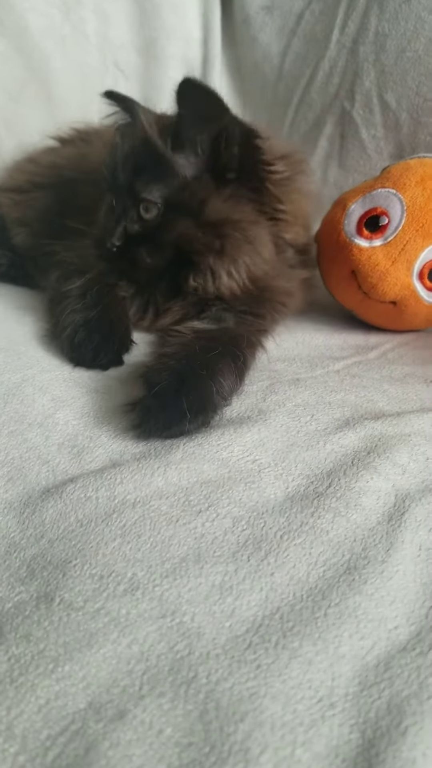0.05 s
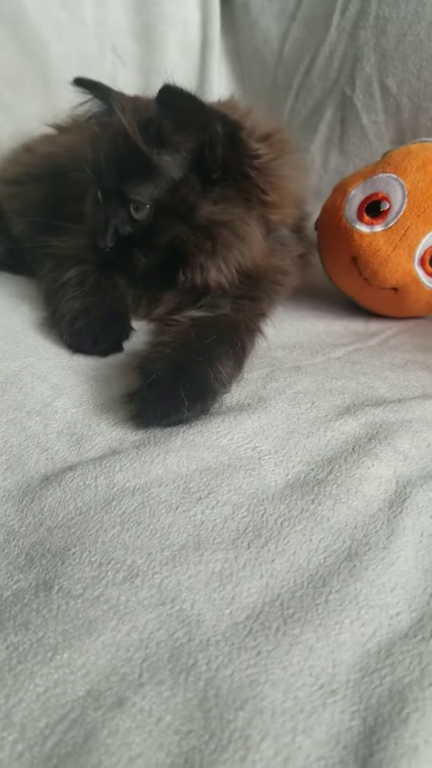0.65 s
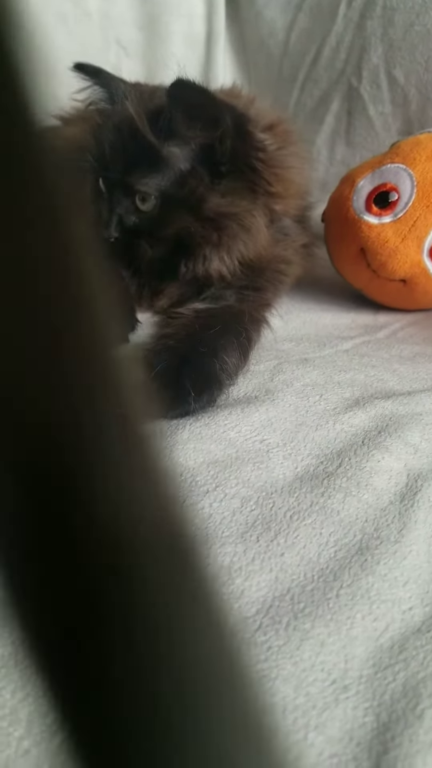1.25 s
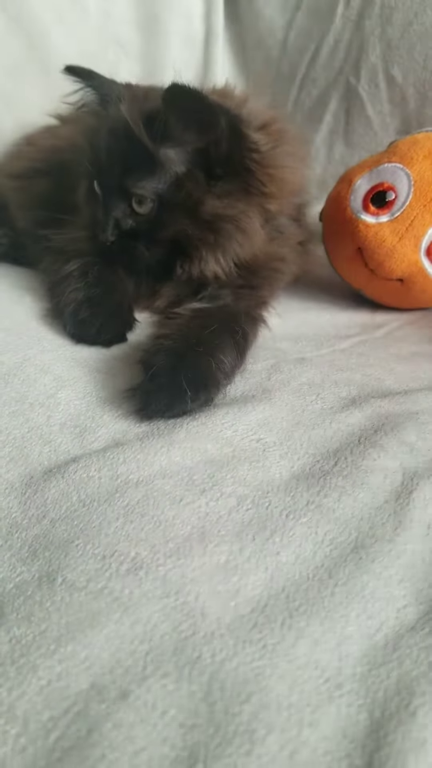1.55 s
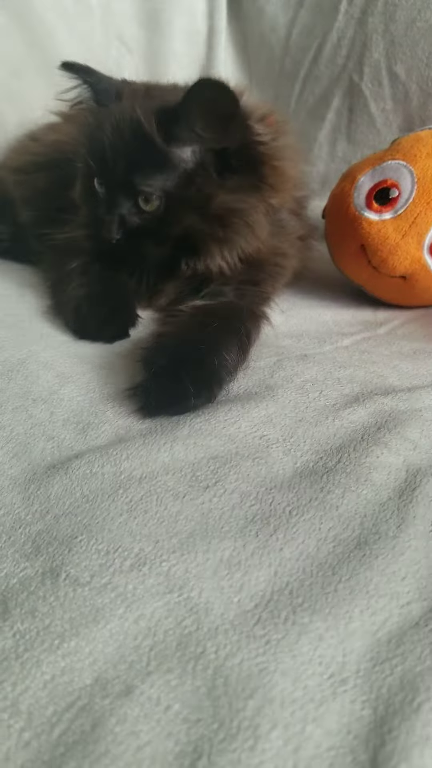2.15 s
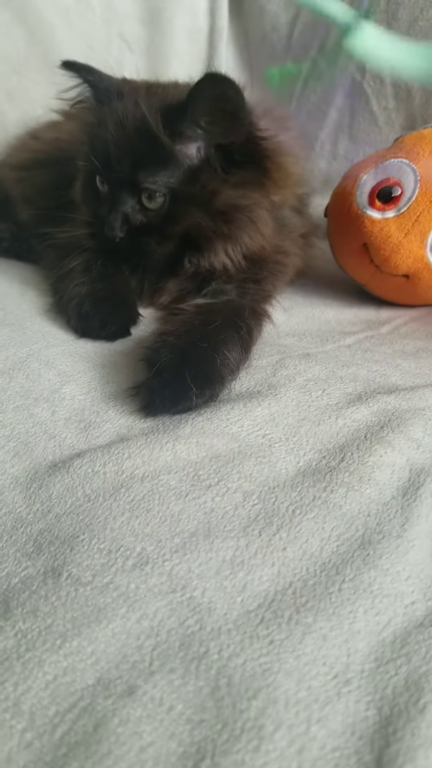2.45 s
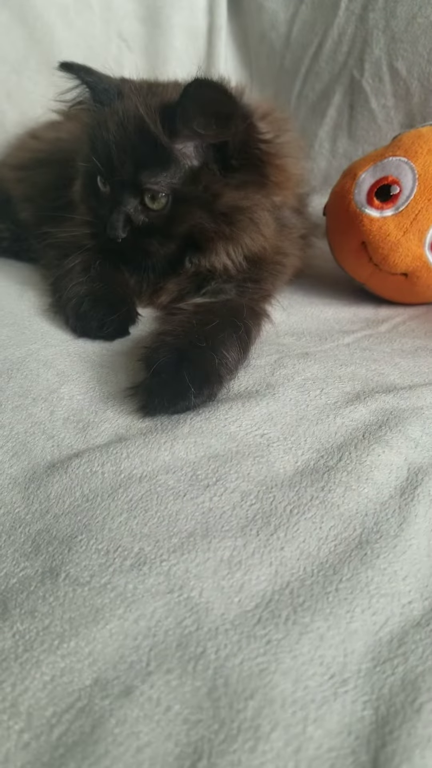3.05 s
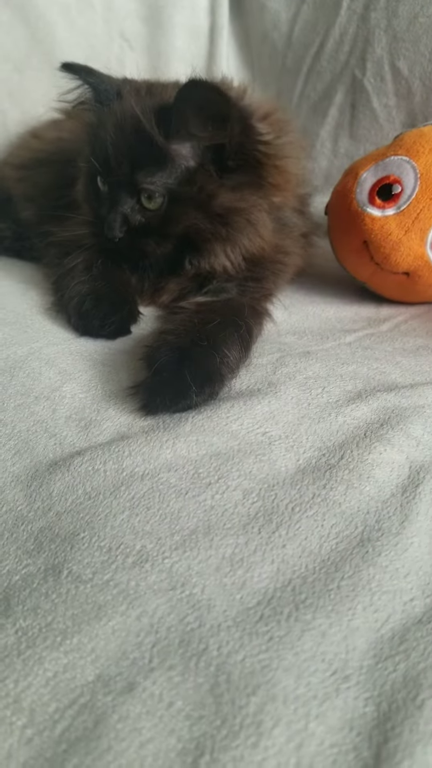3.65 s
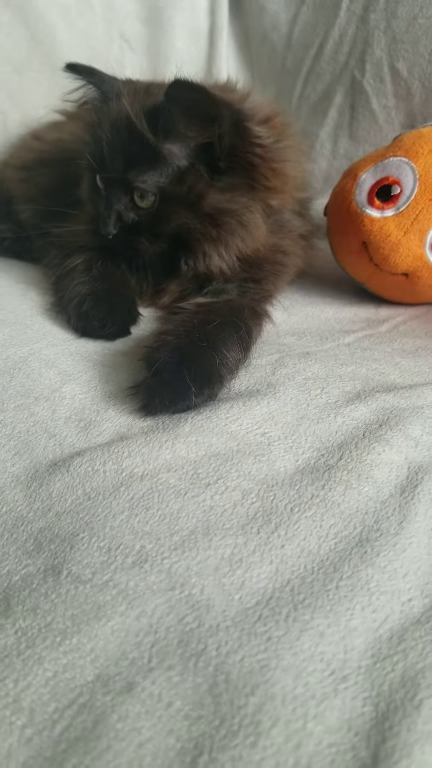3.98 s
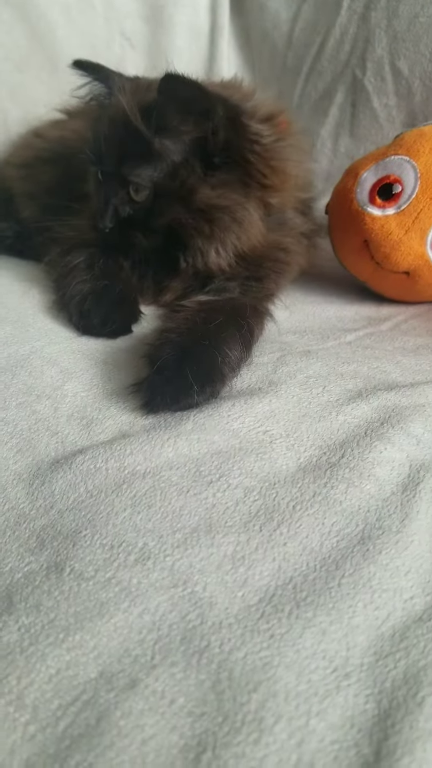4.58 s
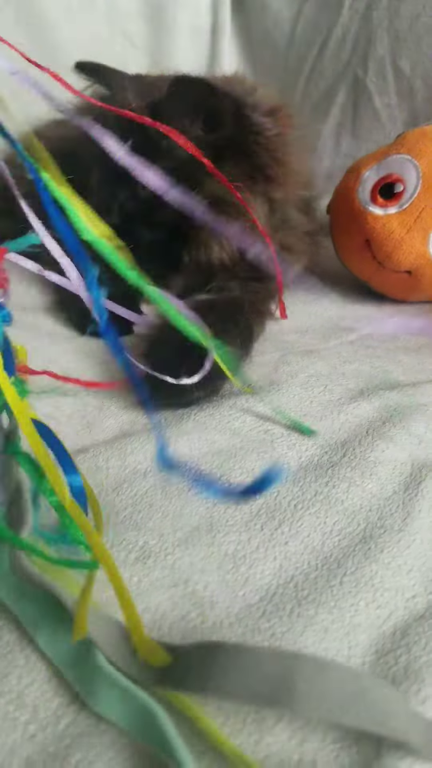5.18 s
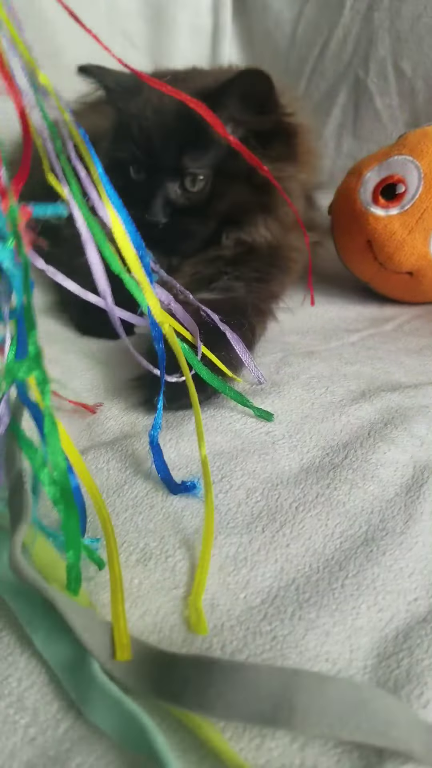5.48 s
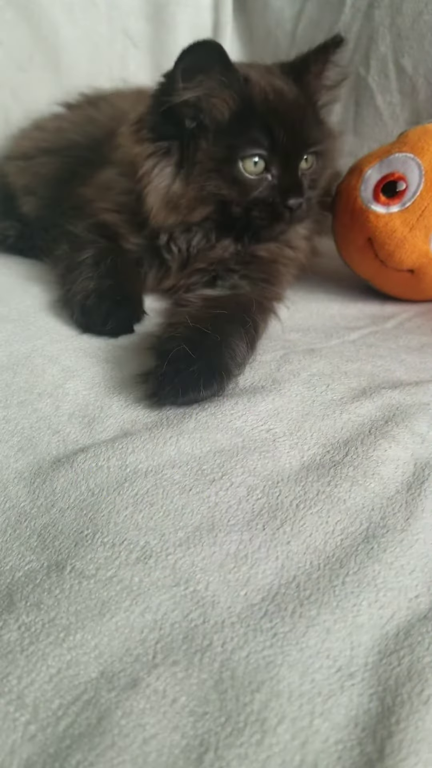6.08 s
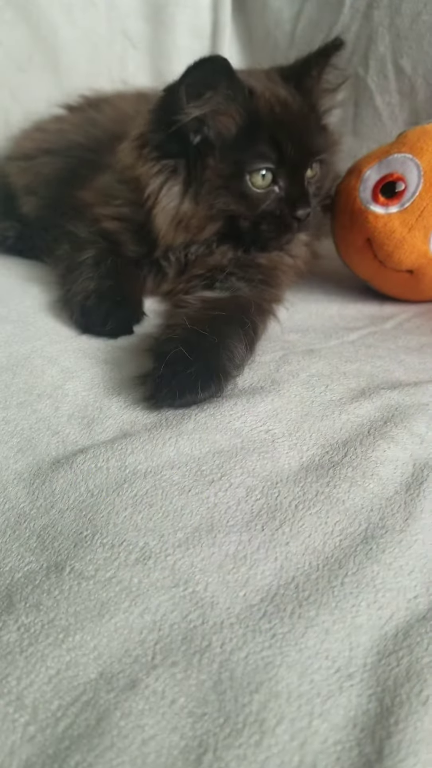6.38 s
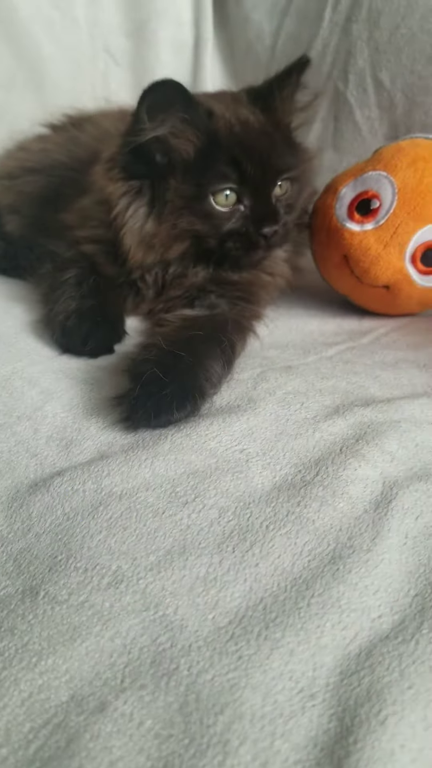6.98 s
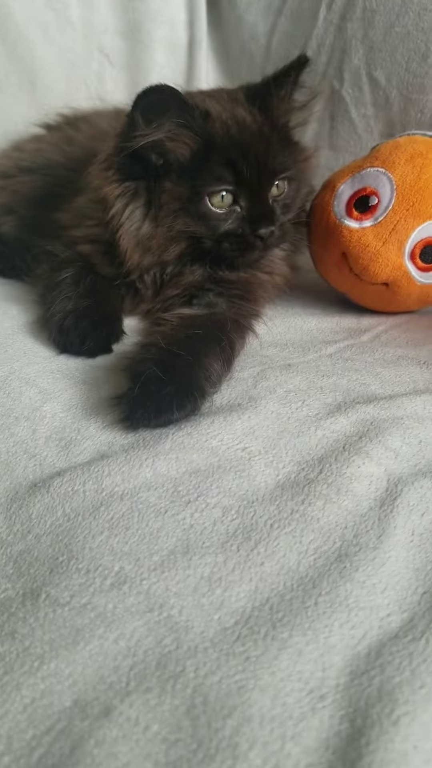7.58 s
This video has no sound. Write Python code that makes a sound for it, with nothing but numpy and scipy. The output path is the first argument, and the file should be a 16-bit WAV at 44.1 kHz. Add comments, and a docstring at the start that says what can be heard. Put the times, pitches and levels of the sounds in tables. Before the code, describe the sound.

Light, high jingling from a shaken ribbon wand toy comes and goes indoors, broken by several close taps on the microphone.

```python
"""Pellet bell on a ribbon wand

The wand is shaken in short bursts for a kitten, just right of a phone in a quiet room.
Each jerk throws the pellet against the shell; gentle sways make it tumble. The ribbons swish.
Now and then the wand taps the phone, mostly beside its left microphone."""
import sys
import numpy as np
from scipy import signal
from scipy.fft import rfft, irfft, next_fast_len
from scipy.io import wavfile
from scipy.ndimage import uniform_filter1d

SR = 44100
rng = np.random.default_rng(int(sys.argv[2]) if len(sys.argv) > 2 else 0)


def inscribe(sig):
    """Save sig as 16-bit PCM at rate SR to the path in sys.argv[1].

    A 1-D sig is mono; a 2-D sig holds one channel per row.
    Samples are clipped to [-1, 1] before scaling.
    """
    pcm = np.round(np.clip(np.atleast_2d(sig).T, -1, 1) * 32767)
    wavfile.write(sys.argv[1], SR, pcm.astype(np.int16))


N = 345303

# noise floor per microphone: freq_hz, density_db
FLOOR_LEFT = [(130, -91.5), (230, -106), (700, -113), (1100, -113), (1380, -99), (1950, -95), (2500, -110),
              (3400, -117), (9000, -119), (14500, -116)]
FLOOR_RIGHT = [(130, -82.5), (250, -91.5), (380, -103), (520, -102), (700, -111), (1400, -114),
               (9000, -119.5), (14500, -117.5)]
# faint treble hiss fading at the start, ribbon sweeps, hand shifts, room echo after the 3.99 s tap:
# peak_s, sigma_s, level_db, centre_hz, sigma_octaves
NOISE_SWELLS = [(0.03, 0.39, -68.5, 4900, 2.7), (0.379, 0.02, -55.5, 296, 1.6),
                (1.83, 0.031, -56, 1540, 1.4), (2.151, 0.045, -63, 1700, 1.2),
                (2.91, 0.04, -59.5, 1930, 1.54), (3.246, 0.031, -61.5, 1476, 0.9),
                (4.036, 0.036, -53, 1170, 1.25), (5.906, 0.031, -52, 127, 1.2),
                (6.963, 0.036, -51, 90.2, 0.47)]
# wand sways: start_s, end_s, mid_sway_contact_db
SWAYS = [(0.056, 0.262, -76), (0.454, 0.719, -73), (0.889, 1.158, -65.5), (1.207, 1.254, -59.5),
         (2.686, 2.95, -66), (3.515, 3.631, -65), (4.9, 5.058, -65.5), (5.096, 5.319, -72.5),
         (6.513, 6.673, -60), (6.894, 7.305, -76.5)]
# pellet throws: time_s, level_db, tick_rel_db (high if square, low if glancing), bounce_rel_db
STRIKES = [(0.134, -62, -8.5, -3.5), (0.427, -63, -10.5, -11.5), (0.634, -66.5, -14, -5),
           (1.012, -64, -3, 1), (1.059, -60, -11, 1.5), (1.121, -62.5, -5.5, -1.5), (1.251, -48, -19, -8),
           (1.334, -54, -8, -11), (1.612, -62.5, -7.5, 1.5), (1.645, -60.5, -12, -13.5),
           (1.741, -56.5, -8, -2.5), (1.7839, -36, -8, -22), (1.841, -47, -17, -14.5),
           (1.9584, -42, -26.5, -19.5), (1.996, -55, -12, -10), (2.045, -53.5, -1.5, -15.5),
           (2.0618, -46, -26, -7.5), (2.118, -48.5, -2.5, -3.5), (2.413, -73.5, -10, -27),
           (2.753, -51, -14, 1), (2.801, -47, -6, -2.5), (2.808, -42, -19.5, -20.5), (2.945, -54.5, -3, -9),
           (3.051, -57, -4.5, -1.5), (3.197, -58.5, -19.5, 3.5), (3.244, -57, -4, -15),
           (3.457, -56, -17, -3.5), (3.513, -54.5, -5, 0), (3.751, -68.5, -2.5, 1.5),
           (3.887, -76, -1, -18.5), (4.163, -70, 4.5, -14), (4.2778, -47, -29, -7.5), (4.38, -54, -7.5, -6),
           (4.4121, -47.5, 0.5, -10.5), (4.441, -47, -9, -9), (4.488, -53, -26, -3), (4.613, -49, -10, -1),
           (4.636, -52.5, 3, -10.5), (4.717, -61, -9.5, -8), (4.879, -54, -25, -3), (4.989, -59.5, -8.5, 1),
           (6.55, -55, -28, -5.5), (6.5755, -42, -7, -9), (6.616, -44.5, -18, -1), (6.697, -44, -12.5, -1),
           (6.745, -52, -12, -1.5), (6.912, -64.5, -5.5, -4.5), (7.058, -70, -8.5, -3),
           (7.298, -63, -3, 0.5), (7.329, -64.5, -4.5, -14)]
# shell modes: freq_hz, gain_db, t60_s
LOW_MODES = [(5082, 0, .07), (5140, -2, .03), (5430, -6, .025), (6170, -13, .04)]
HIGH_MODES = [(11750, -5, .05), (11830, -9, .025), (12915, 0, .05), (12970, -2, .028)]
# pellet contact spectrum: freq_hz, gain_db
TICK_SPECTRUM = [(3000, -3), (4400, -5.5), (5400, 5.5), (6900, -7), (8800, 1.5), (10700, -7), (12400, 2),
                 (13500, -3), (14600, -2.5)]
# room decay: freq_hz, t60_s
ROOM_DECAY = [(2000, .29), (14000, .23)]
# wand on phone: time_s, peak_db, highpass_hz, lowpass_hz, left_minus_right_db, room_rel_db
TAPS = [(1.2533, 0, 80.8, 3600, 17, -33), (2.347, -44.5, 50, 497, 29, -23.5),
        (3.035, -39.5, 1300, 1060, -10.5, -5), (3.992, -20, 480, 3800, 34, -25),
        (4.7465, -11.5, 63.5, 872, 23, -24.5), (4.989, -34, 70, 1213, 42, -7.5),
        (5.870, -24, 800, 15200, -22.5, -8.5), (5.881, -26.5, 798, 15000, -27, -7)]
# phone casing response: freq_hz, gain_db
CASING = [(110, 0), (280, -2.5), (480, 1.5), (750, -3.5), (1050, 2), (1680, -6), (1900, 6), (2400, 4),
          (3400, 3.5), (4400, -5), (14000, -6)]


def amp(db):
    """Decibels to gain."""
    return 10 ** (np.asarray(db) / 20)


def unit_rms(x):
    """x at rms 1."""
    return x / np.sqrt(np.mean(x ** 2) + 1e-20)


def log_interp(points, hz):
    """(freq_hz, value) points read on a log axis."""
    freqs_hz, values = np.transpose(points)
    return np.interp(np.log(hz + 1), np.log(freqs_hz + 1), values)


def decay(t, t60_s):
    """Exponential, -60 dB at t60_s."""
    return np.exp(-np.log(1000) * t / t60_s)


def filtered(x, response):
    """x through the gain response(hz)."""
    size = next_fast_len(N + SR // 2)
    return irfft(rfft(x, size) * response(np.fft.rfftfreq(size, 1 / SR)), size)[..., :N]


def impulse(response, size=2048):
    """Minimum-phase pulse with gain response(hz)."""
    cepstrum = irfft(np.log(np.maximum(response(np.fft.rfftfreq(size, 1 / SR)), 1e-6)))
    cepstrum[1:size // 2] *= 2
    cepstrum[size // 2 + 1:] = 0
    return irfft(np.exp(rfft(cepstrum)))


def add(track, start_s, sound):
    """Mix sound into track."""
    part = track[..., max(round(start_s * SR), 0):][..., :sound.shape[-1]]
    part += sound[..., :part.shape[-1]]


def background():
    """Room rumble and microphone hiss, with a band near 1.7 kHz on the left."""
    white = rng.standard_normal((2, N)) * np.sqrt(SR / 2)  # unit power per Hz
    return filtered(white, lambda hz: amp([log_interp(FLOOR_LEFT, hz), log_interp(FLOOR_RIGHT, hz)]))


def noise_swells(grain_db=3, left_db=-12, size=16384):
    """Soft, grainy swells of band noise: opening hiss, ribbon sweeps, hand shifts, one tap's echo."""
    out = np.zeros((2, N))
    t = (np.arange(size) - size / 2) / SR
    hz = np.fft.rfftfreq(size, 1 / SR)
    for peak_s, sigma_s, level_db, centre_hz, sigma_octaves in NOISE_SWELLS:
        grain = amp(grain_db * unit_rms(uniform_filter1d(rng.standard_normal(size), size=128)))
        band = np.exp(-.5 * (np.log2((hz + 1) / centre_hz) / sigma_octaves) ** 2)
        noise = unit_rms(irfft(rfft(grain * rng.standard_normal((2, size))) * band))
        swell = np.exp(-.5 * (t / sigma_s) ** 2)
        add(out, peak_s + t[0], amp(level_db) * amp([[left_db], [0]]) * noise * swell)
    return out


def tumbles(gap_s=.042, edge_db=2.5, scatter_db=2, tick_db=-11.5, bounce_db=-4):
    """Uneven soft pellet hits that swell and fade with each sway; rows as in STRIKES."""
    hits = []
    for start_s, end_s, mid_db in SWAYS:
        count = max(round((end_s - start_s) / gap_s), 1)
        for k in range(count):
            progress = (k + rng.random()) / count
            level_db = mid_db - edge_db * (2 * progress - 1) ** 2 + scatter_db * rng.standard_normal()
            hits.append((start_s + progress * (end_s - start_s), level_db, tick_db, bounce_db))
    return hits


def pellet_contacts(bounce_db, bounce_life_s=.016, skid_s=.0088, base_chatter_s=.004, count=6):
    """Times and forces as the pellet skids in, chatters on the shell and bounces away."""
    def forces(times_s, scatter_db=3):
        return amp(scatter_db * rng.standard_normal(len(times_s))) / np.sqrt(len(times_s))

    def dwindling(times_s, life_s):
        return forces(times_s) * unit_rms(np.sqrt(np.exp(-times_s / life_s)))

    # a glancing pellet rattles on, skids more and settles later
    chatter_s = base_chatter_s * (1 + min(amp(bounce_db), 2))
    skids_s = -skid_s * rng.random(count)
    chatters_s = chatter_s * (np.arange(count) + rng.random(count)) / count
    bounces_s = np.e * bounce_life_s * rng.random(4 * count)
    skid = amp(-17 + bounce_db / 2) * forces(skids_s)
    chatter = dwindling(chatters_s, chatter_s / 2)
    bounce = amp(bounce_db) * dwindling(bounces_s, bounce_life_s)
    return np.r_[skids_s, chatters_s, chatter_s + bounces_s], np.r_[skid, chatter, bounce]


def jingle(low_db, tick_db, bounce_db, spot_db=3, detune=.0012, tick_t60_s=.013, size=6144, lead=512):
    """One hit: contacts ring the shell and tick. Returns the sound and its lead time in s."""
    t = np.arange(size) / SR
    delays_s, forces = pellet_contacts(bounce_db)
    indices = np.clip((delays_s * SR).astype(int) + lead, 0, size - 1)

    def struck(response):
        # each contact lands on a new spot and pushes a mode either way
        signs = np.sign(rng.standard_normal(len(indices)))
        blows = np.bincount(indices, forces * signs, size)
        return unit_rms(signal.fftconvolve(blows, response)[:size])

    def ring(modes):
        shell = np.zeros(size)
        for hz, gain_db, t60_s in modes:
            gain = amp(gain_db + spot_db * rng.standard_normal())
            loaded_hz = hz * (1 + detune * rng.standard_normal())  # pellet loads the shell
            shell += gain * struck(np.sin(2 * np.pi * loaded_hz * t) * decay(t, t60_s))
        return unit_rms(shell)

    burst = rng.standard_normal(size) * decay(t, tick_t60_s)
    tick = signal.fftconvolve(burst, impulse(lambda hz: amp(log_interp(TICK_SPECTRUM, hz))))[:size]
    return ring(HIGH_MODES) + amp(low_db) * ring(LOW_MODES) + amp(tick_db) * struck(tick), lead / SR


def bell(hits, gain_db=-1.5, hardness_db=5, firm_db=-50, room_db=-10, left_db=-17, left_room_db=-11):
    """Pellet bell near the right microphone; the phone shades the left."""
    out = np.zeros((2, N))
    for time_s, level_db, tick_db, bounce_db in hits:
        # square blows wake the low modes; glancing and fast ones favour the high
        low_db = 2 + .33 * tick_db - .08 * (level_db - firm_db)
        sound, lead_s = jingle(low_db, tick_db + hardness_db, bounce_db)
        sound *= amp(level_db + gain_db)
        reverb = amp(room_db) * room(sound, build_up_s=.004)
        add(out, time_s - lead_s, amp([[left_db], [0]]) * sound)
        add(out, time_s - lead_s, amp([[left_room_db], [0]]) * reverb)
    # a small shell barely radiates below its first mode
    return signal.sosfilt(signal.butter(6, 4250, "high", fs=SR, output="sos"), out)


def room(x, build_up_s):
    """Stereo reverberation: a fresh noise tail for each source position."""
    hz, t, spectra = signal.stft(rng.standard_normal((2, SR // 3)), SR, nperseg=256)
    swell = 1 - np.exp(-(t / build_up_s) ** 2)
    t60_s = log_interp(ROOM_DECAY, hz)[:, None]
    tail = signal.istft(spectra * swell * decay(t, t60_s), SR, nperseg=256)[1]
    return signal.fftconvolve(x[None], tail / np.linalg.norm(tail[0]), axes=1)


def taps(radiate_hz=700, left_room_db=-8):
    """Wand on phone: one push through the casing per tap; softer contact loses treble."""
    direct, reverb = np.zeros((2, 2, N))
    for time_s, peak_db, highpass_hz, lowpass_hz, pan_db, room_db in TAPS:
        def response(hz):
            rolloff = np.sqrt((1 + (highpass_hz / (hz + 1)) ** 6) * (1 + (hz / lowpass_hz) ** 6))
            return amp(log_interp(CASING, hz)) / rolloff

        push = impulse(response, size=32768)
        push *= -amp(peak_db) / np.abs(push).max()
        add(direct, time_s, amp(np.minimum([[pan_db], [-pan_db]], 0)) * push)
        add(reverb, time_s, amp(room_db) * amp([[left_room_db], [0]]) * room(push, build_up_s=.0031))
    # the small casing sends little bass into the room
    return direct + filtered(reverb, lambda hz: 1j * hz / (radiate_hz + 1j * hz))


def scene():
    """Taps, noise swells and bell over the quiet room."""
    return background() + taps() + noise_swells() + bell(STRIKES) + bell(tumbles())


def record(dry):
    """Phone: full-scale clip, then band limit."""
    cutoff_hz, transition_hz = 14700, 200
    clipped = np.clip(dry, -1, 1)
    return filtered(clipped, lambda hz: np.clip((cutoff_hz - hz) / transition_hz + .5, 0, 1))


dry = scene()
out = record(dry)
inscribe(out)
```